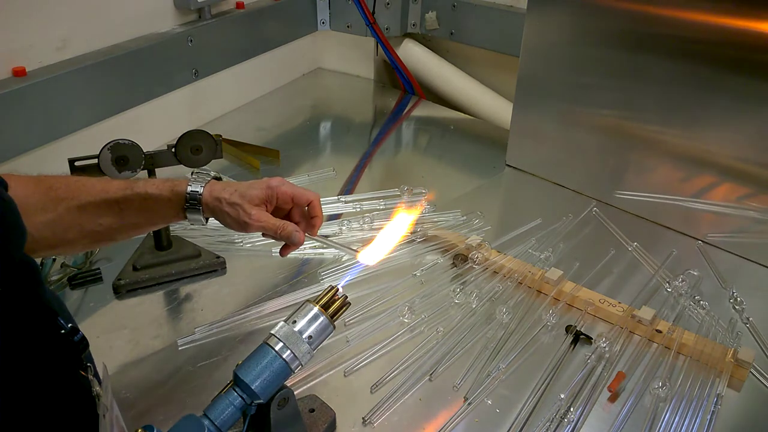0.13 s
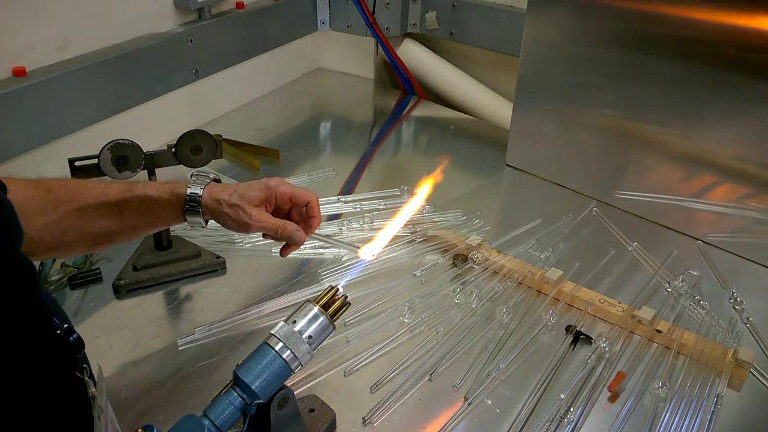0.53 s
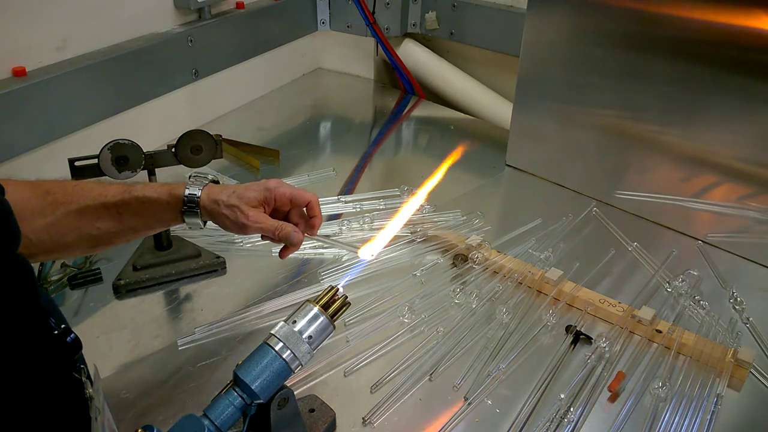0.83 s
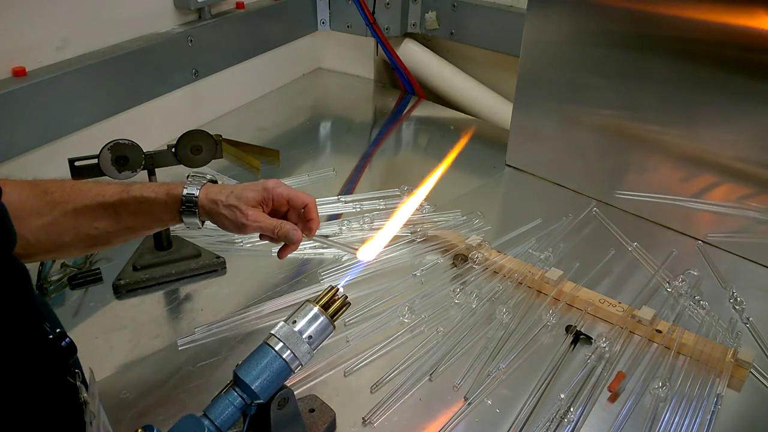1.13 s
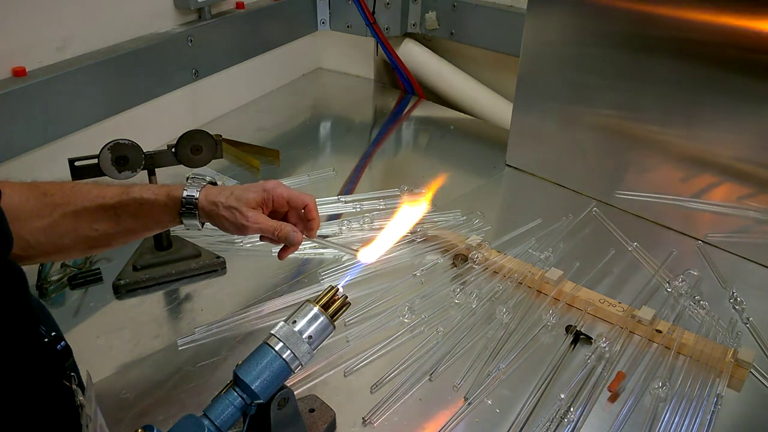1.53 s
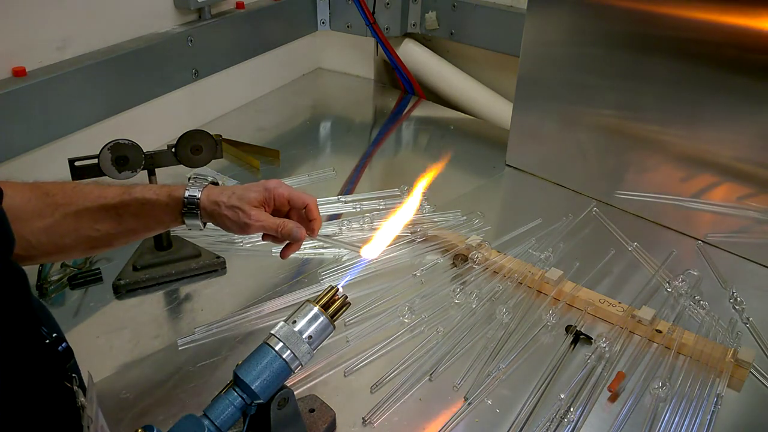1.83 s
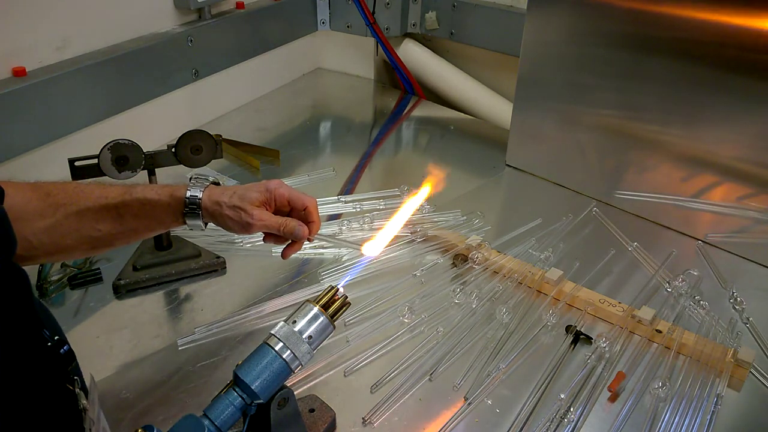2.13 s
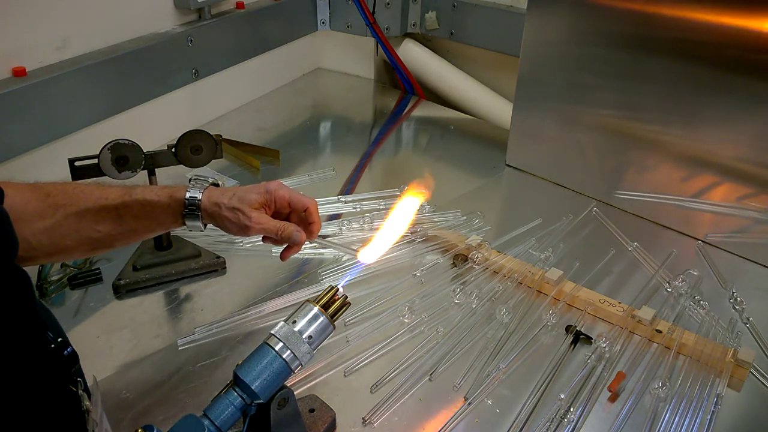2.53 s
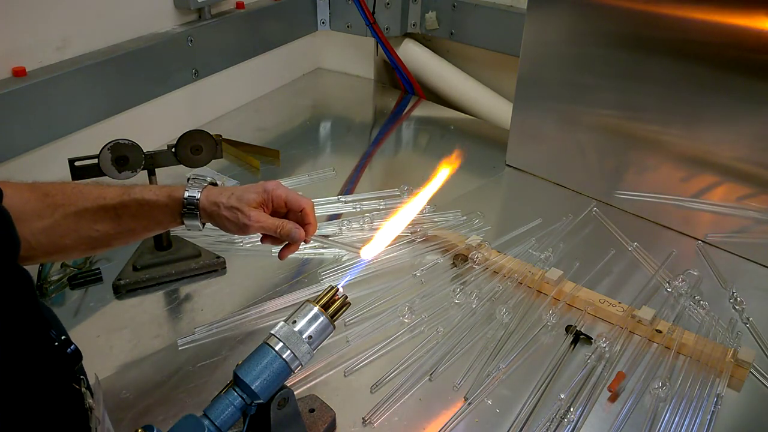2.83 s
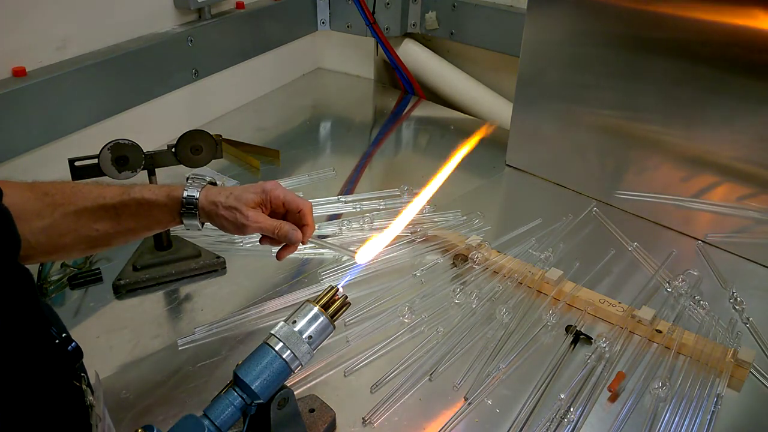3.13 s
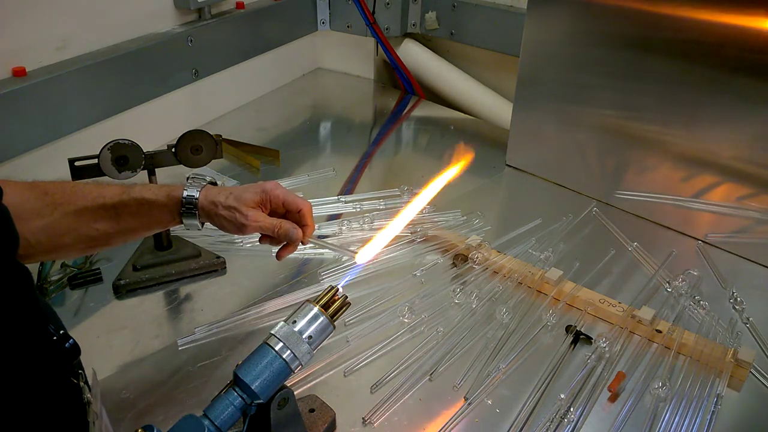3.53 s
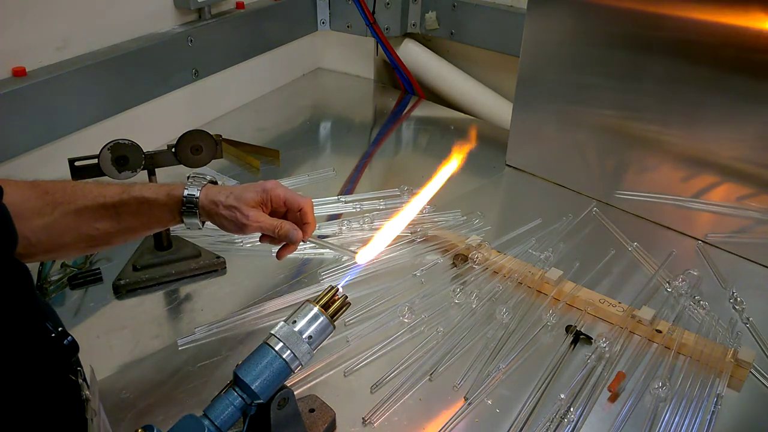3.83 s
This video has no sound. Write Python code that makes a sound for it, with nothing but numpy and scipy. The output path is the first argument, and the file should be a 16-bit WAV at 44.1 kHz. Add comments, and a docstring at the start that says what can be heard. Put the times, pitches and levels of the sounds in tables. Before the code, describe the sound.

A bench gas torch burns without a break from 0 to about 4 seconds: a soft, dark, bass-heavy roar with slight rapid flutter. Very faint gas hiss and thin wavering whistles, strongest around 4 to 6 kHz, sit on top. Behind it an extractor fan hums near 167 Hz, and very deep rumble swells around 1.5, 2.4 and 3.9 seconds. Quiet even background hiss; mono.

```python
"""A glassworker's bench torch burns steadily with a soft, low, fluttering roar: coloured turbulent noise.
Its gas jets hiss as broad noise and its ports whistle faintly as clusters of narrow-band noise.
Behind it an extractor fan hums in unsteady sine tones over deep bass noise on a hand-set level curve,
with a thin even hiss of steady filtered noise."""
import sys
import numpy as np
from scipy import signal
from scipy.fft import rfft, irfft, next_fast_len
from scipy.io import wavfile
from scipy.ndimage import uniform_filter1d, map_coordinates

SR = 44100
rng = np.random.default_rng(int(sys.argv[2]) if len(sys.argv) > 2 else 0)


def inscribe(sig):
    """Save sig as 16-bit PCM at rate SR to the path in sys.argv[1].

    A 1-D sig is mono; a 2-D sig holds one channel per row.
    Samples are clipped to [-1, 1] before scaling.
    """
    pcm = np.round(np.clip(np.atleast_2d(sig).T, -1, 1) * 32767)
    wavfile.write(sys.argv[1], SR, pcm.astype(np.int16))


N = 175077  # length in samples, just under 4 s


def amp(db):
    """Level law: decibels to an amplitude gain."""
    return 10 ** (np.asarray(db) / 20)


def unit(x):
    """Normalisation: x scaled to rms 1."""
    return x / np.sqrt(np.mean(x ** 2) + 1e-30)


def along(points, hz):
    """Spectral envelope: (f/Hz, level/dB) points interpolated on a logarithmic frequency axis."""
    f, level = np.transpose(points)
    return np.interp(np.log(hz + 1), np.log(f + 1), level)


def wobble(rate):
    """Random modulation: a smooth curve through normal random knots, rate of them per second."""
    knots = rng.standard_normal(size=512)
    position = np.arange(N) * rate / SR
    return map_coordinates(knots, [position], mode="wrap")


def filtered(x, response):
    """Linear filtering: the spectrum of x multiplied by a zero-phase frequency response."""
    m = next_fast_len(N + SR // 2)  # zero padding
    f = np.fft.rfftfreq(m, 1 / SR)
    return irfft(rfft(x, m) * response(f), m)[:N]


def noise(response):
    """Subtractive synthesis: white noise shaped by a frequency response, at rms 1."""
    return unit(filtered(rng.standard_normal(N), response))


def bell(f, centre, half_width):
    """Resonance curve: 1 at the centre, 1/2 at half_width to either side."""
    return 1 / (1 + ((f - centre) / half_width) ** 2)


# spectral envelope of the even background hiss: f/Hz, relative spectral density level/dB
FLOOR_SPECTRUM = [(100, 1), (7000, 1.5), (9800, 0.5), (12000, 2.5), (13500, 1), (15700, 1.5)]
FLOOR_DB = -77.5


def background_hiss():
    """Stationary noise: a nearly flat spectrum held at constant level."""
    return amp(FLOOR_DB) * noise(lambda f: amp(along(FLOOR_SPECTRUM, f)))


# spectral envelope of the deep noise: f/Hz, relative spectral density level/dB
RUMBLE_SPECTRUM = [(8, -20), (12, -8.5), (18, -1.5), (25, -9.5), (33, 1), (43, -0.5), (52, -22), (75, -36),
                   (150, -43.5), (600, -90)]
# hand-set level curve of the deep noise: t/s, level/dB
RUMBLE_LEVEL = [(0, -45), (.75, -43), (1.5, -38.5), (1.72, -42.5), (2.2, -43), (2.4, -36), (2.8, -40.5),
                (3.0, -39), (3.35, -45.5), (3.9, -37.5)]


def deep_rumble():
    """Amplitude modulation: deep bass noise under a hand-set level curve."""
    t, level = np.transpose(RUMBLE_LEVEL)
    envelope = amp(np.interp(np.arange(N) / SR, t, level))
    return noise(lambda f: amp(along(RUMBLE_SPECTRUM, f))) * envelope


# tones of the extractor fan: f/Hz, level/dB
FAN_TONES = [(167.2, -50.5), (484.3, -70.5)]
FAN_DRIFT_HZ, FAN_WAVER_DB, FAN_KNOTS_PER_S = 0.46, 0.85, 4.98


def extractor_fan():
    """Tonal radiation: sinusoids with small random frequency and amplitude modulation."""
    out = np.zeros(N)
    for hz, db in FAN_TONES:
        frequency = hz + FAN_DRIFT_HZ * wobble(FAN_KNOTS_PER_S)
        cycles = np.cumsum(frequency) / SR + rng.random()
        tone = np.sqrt(2) * np.sin(2 * np.pi * cycles)  # rms 1
        out += tone * amp(db + FAN_WAVER_DB * wobble(FAN_KNOTS_PER_S))
    return out


# whistling resonances of the gas ports: f/Hz, equivalent noise bandwidth/Hz, level/dB
PORT_RESONANCES = [(2550, 50, -91.5), (3060, 47, -89.5), (4000, 55, -80), (4066, 32, -80.5),
                   (4167, 54, -84.5), (4700, 41, -87.5), (4756, 34, -84), (4840, 54, -85), (5580, 34, -81),
                   (5670, 27, -89.5), (5670, 28, -103), (6750, 220, -87.5), (7920, 150, -91),
                   (8750, 41, -93), (8880, 200, -91.5), (9320, 40, -93.5), (9440, 180, -93),
                   (10240, 78, -95.5), (10600, 320, -94.5)]
WHISTLE_WAVER_DB, WHISTLE_KNOTS_PER_S = 1.2, 10


def port_whistles():
    """Resonance: each port mode passes a narrow band of noise, wavering on its own."""
    out = np.zeros(N)
    for hz, bandwidth, db in PORT_RESONANCES:
        half_width = bandwidth * 2 / np.pi  # of the amplitude curve
        whistle = noise(lambda f: bell(f, hz, half_width))
        out += whistle * amp(db + WHISTLE_WAVER_DB * wobble(WHISTLE_KNOTS_PER_S))
    return out


# spectral envelope of the gas jets: f/Hz, relative spectral density level/dB
JET_SPECTRUM = [(500, -4), (1800, -2), (3000, -0.5), (4400, 3.5), (5300, 0.5), (6100, 0), (6500, -9),
                (7200, -24.5), (9000, -17), (15000, -46)]
JET_DB = -71.5


def jet_hiss():
    """Jet noise: gas issuing from the ports gives a broad, steady hiss."""
    return amp(JET_DB) * noise(lambda f: amp(along(JET_SPECTRUM, f)))


PATCHY_DB = 0.64  # rms spread of the patch gains


def eddies():
    """Turbulence: white noise whose gain varies in patches of time and frequency."""
    spectrum = signal.stft(rng.standard_normal(N), nperseg=512)[2]
    field = rng.standard_normal(spectrum.shape)
    field = uniform_filter1d(field, size=8, axis=0)  # about 0.7 kHz
    field = uniform_filter1d(field, size=10, axis=1)  # about 60 ms
    return signal.istft(spectrum * amp(PATCHY_DB * unit(field)), nperseg=512)[1][:N]


# spectral envelope of the flame's roar: f/Hz, relative spectral density level/dB
ROAR_SPECTRUM = [(60, -3), (120, 1), (240, -5.5), (330, -11.5), (500, -14.5), (700, -19.5), (1000, -24.5),
                 (1500, -31.5), (2200, -38.5), (4000, -54.5), (9000, -76)]
# colouring of the roar by the bench and hood: f/Hz, full width at half lift/Hz, lift/dB
BENCH_MODES = [(63.15, 4.4, 13), (84, 17.8, 10.5), (125, 8, 1.5), (158.4, 6.5, 6), (218, 7, 4.5),
               (247.6, 12, 4.5), (284, 6.5, 4), (303.7, 9.8, 4), (341, 7.4, 7), (403, 13.3, 6),
               (468, 7.2, -0.5), (644, 25, 2)]
ROAR_DB, FLUTTER_DB, FLUTTER_KNOTS_PER_S = -45.5, 0.45, 29
LICK_DB, LICK_KNOTS_PER_S, LICK_HZ = 1.07, 24, 800  # licks stir the roar above LICK_HZ


def flame_roar():
    """Combustion noise: a turbulent roar, coloured by bench and hood, whose upper part varies with licks."""
    def colour(f):
        lift = sum(db * bell(f, hz, width / 2) for hz, width, db in BENCH_MODES)
        return amp(along(ROAR_SPECTRUM, f) + lift)

    roar = unit(filtered(eddies(), colour))
    body = filtered(roar, lambda f: 1 / (1 + (f / LICK_HZ) ** 4))
    licks = (roar - body) * amp(LICK_DB * wobble(LICK_KNOTS_PER_S))
    flutter = amp(ROAR_DB + FLUTTER_DB * wobble(FLUTTER_KNOTS_PER_S))
    return (body + licks) * flutter


def scene():
    """Superposition: background, fan and torch sum at one microphone."""
    background = background_hiss() + deep_rumble() + extractor_fan()
    torch = port_whistles() + jet_hiss() + flame_roar()
    return (background + torch)[None]


TOP_HZ = 15730


def record(dry):
    """Band limiting: nothing is kept at or above TOP_HZ."""
    return filtered(dry[0], lambda f: f < TOP_HZ)[None]


dry = scene()
out = record(dry)
inscribe(out)
```